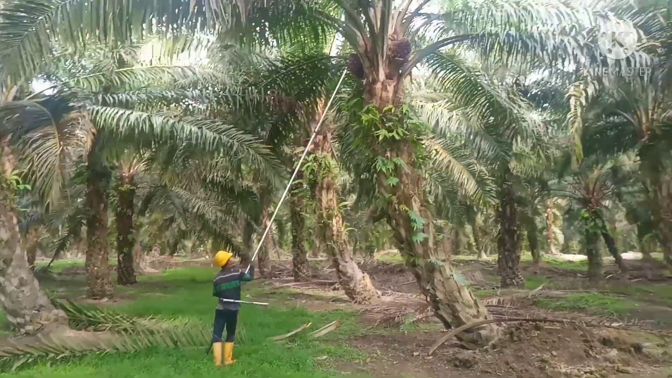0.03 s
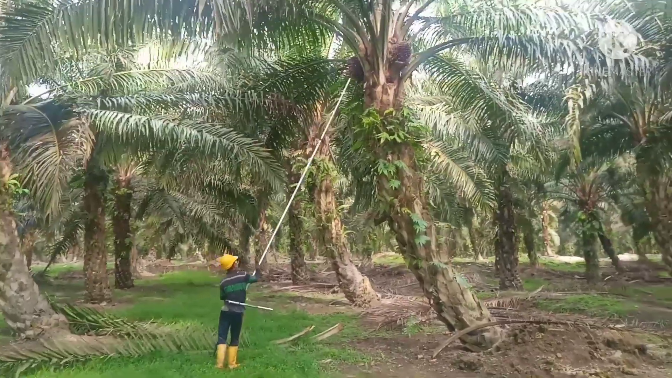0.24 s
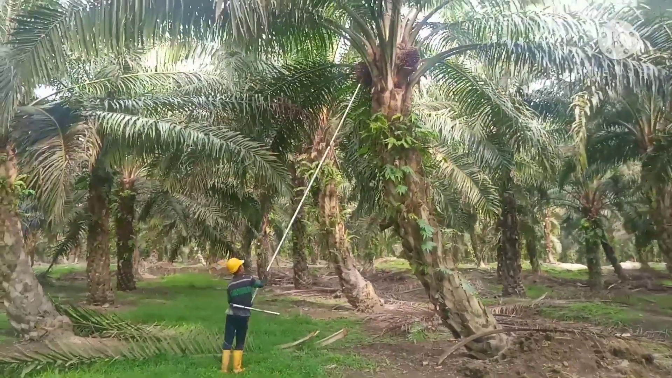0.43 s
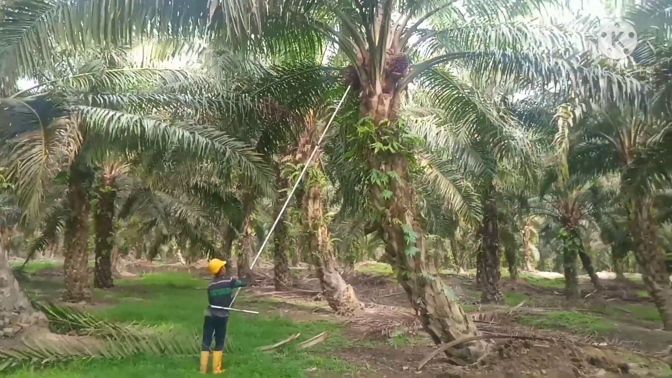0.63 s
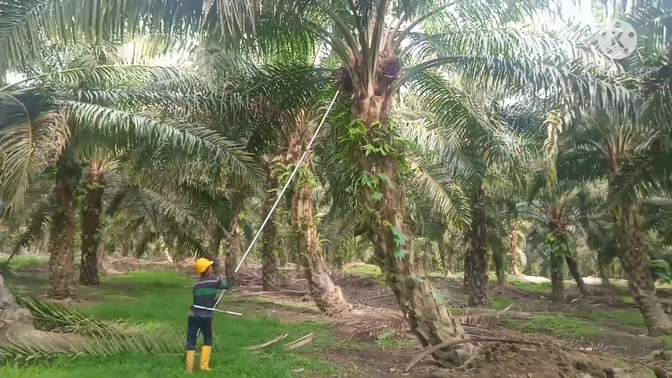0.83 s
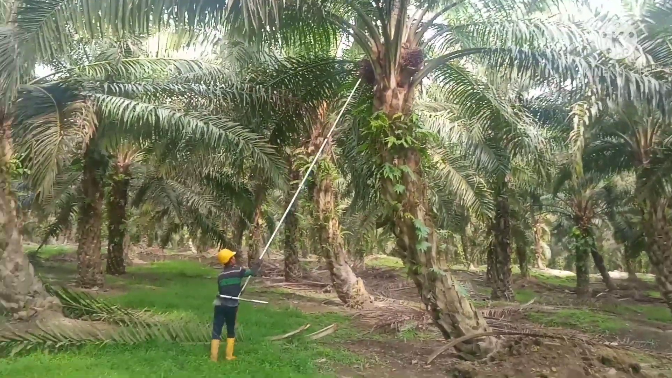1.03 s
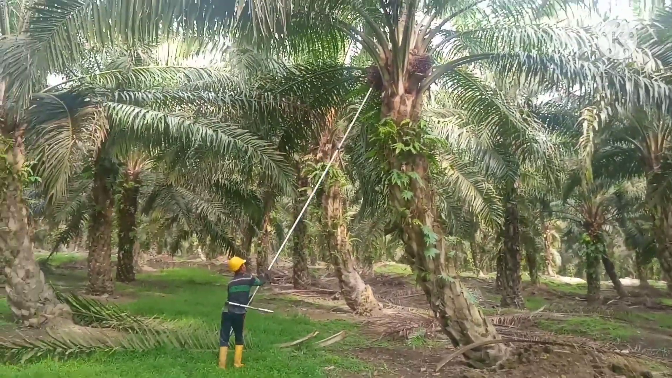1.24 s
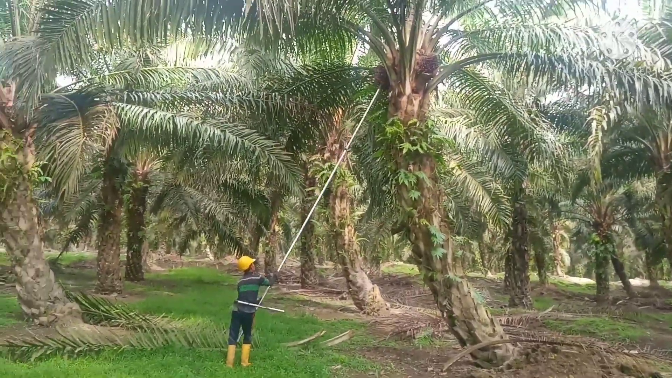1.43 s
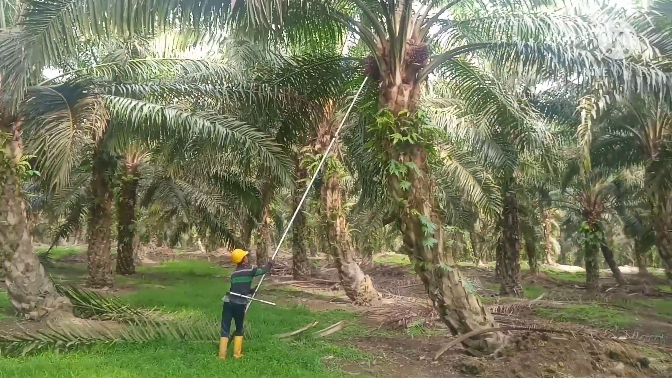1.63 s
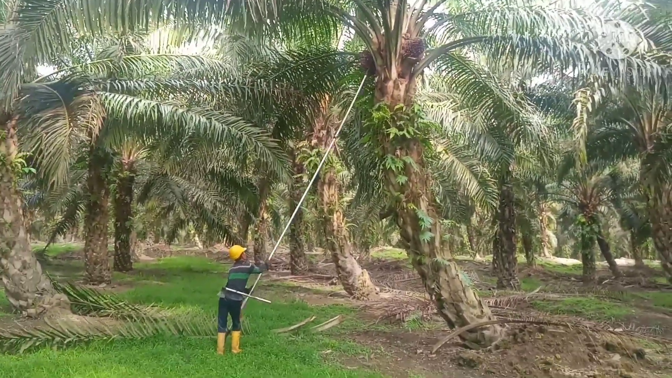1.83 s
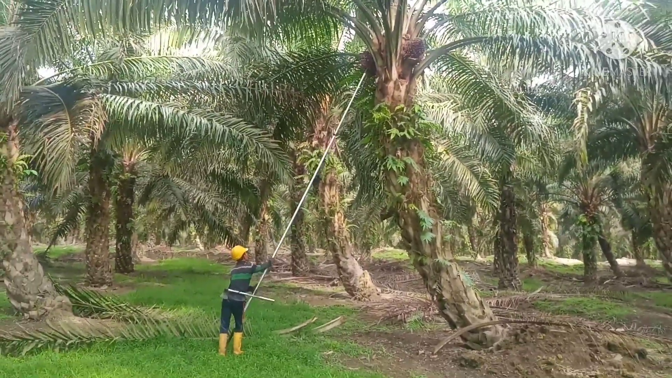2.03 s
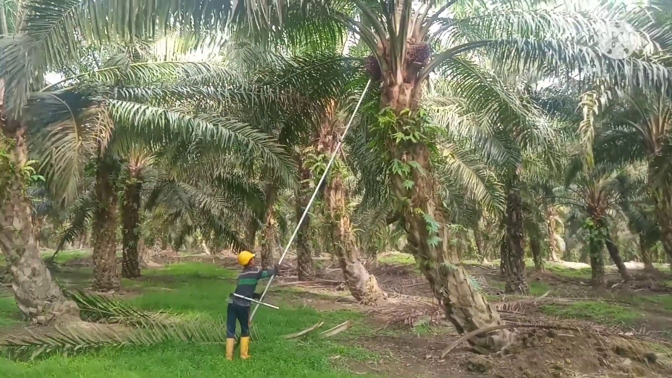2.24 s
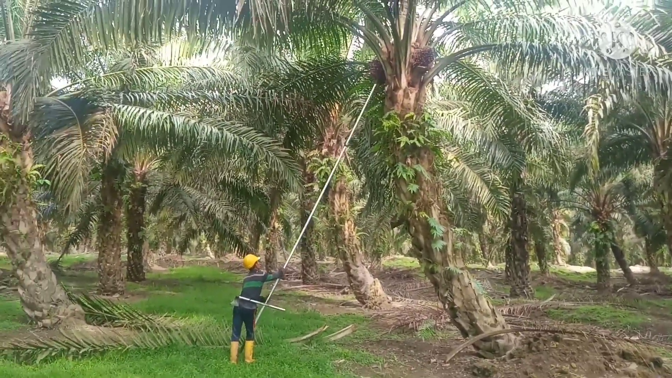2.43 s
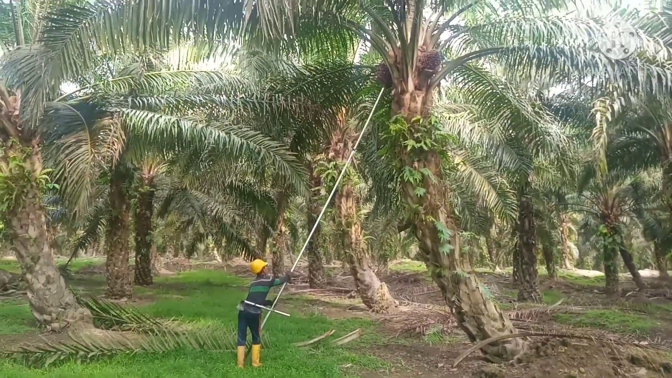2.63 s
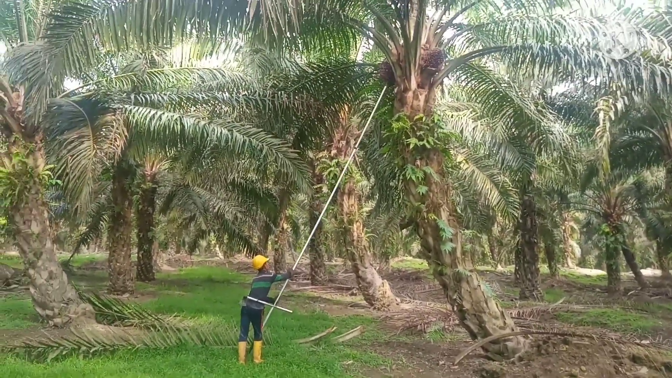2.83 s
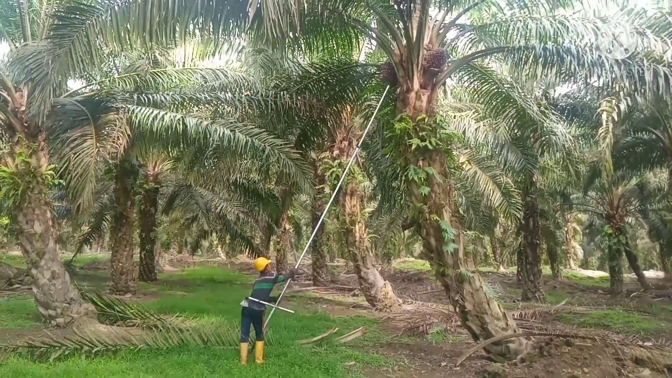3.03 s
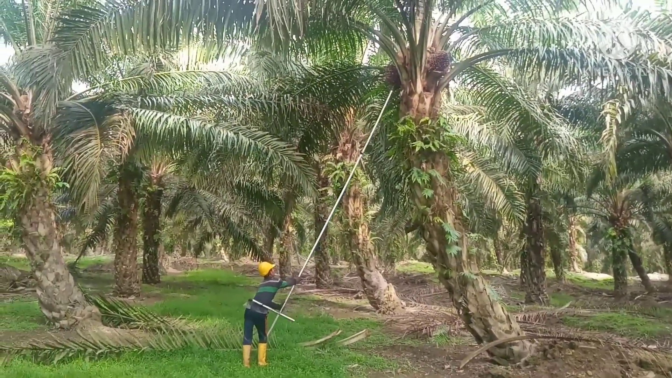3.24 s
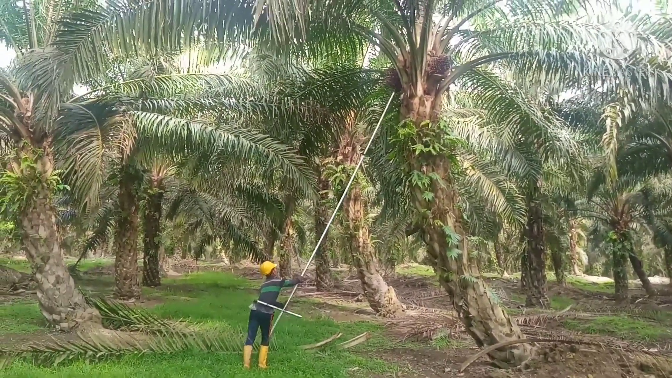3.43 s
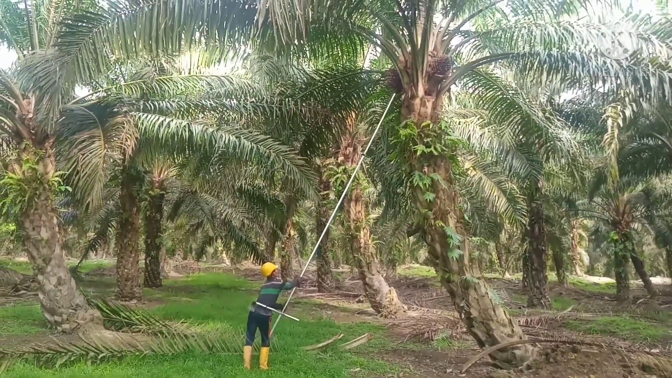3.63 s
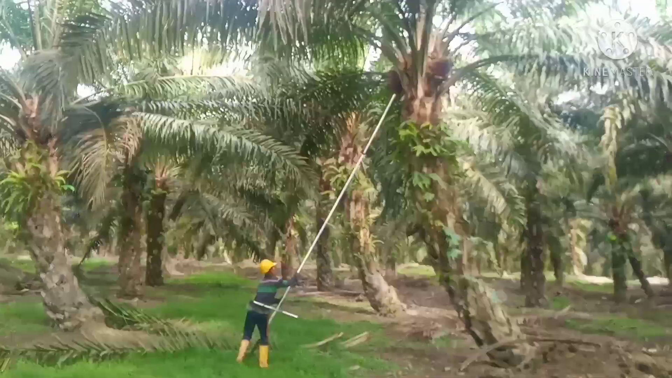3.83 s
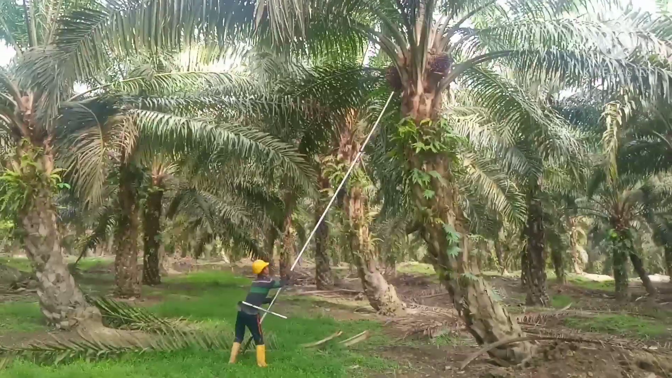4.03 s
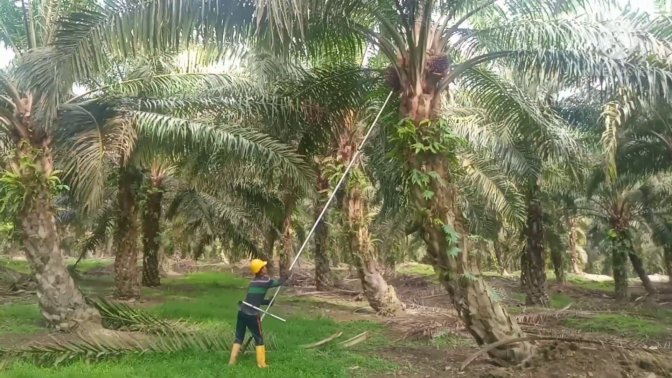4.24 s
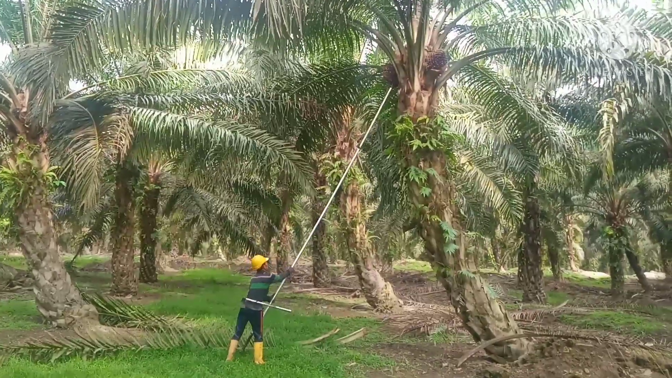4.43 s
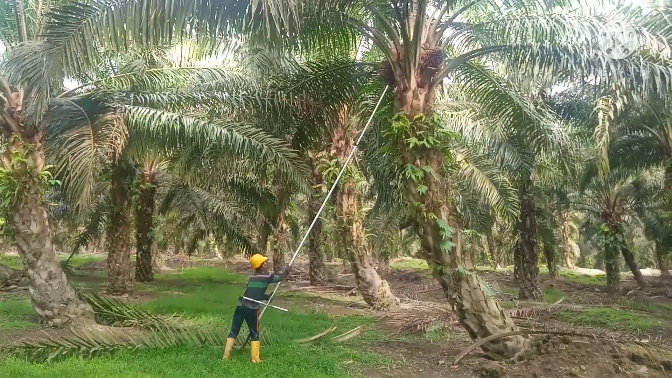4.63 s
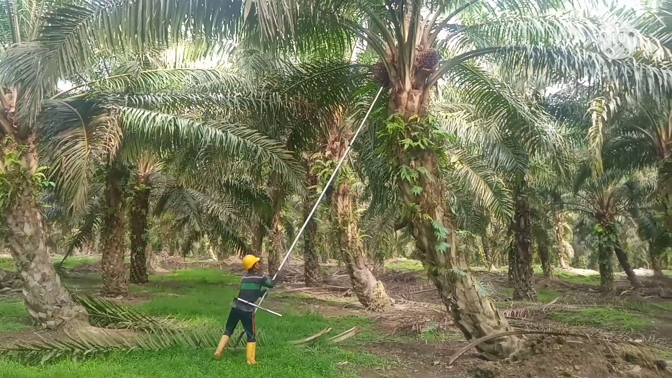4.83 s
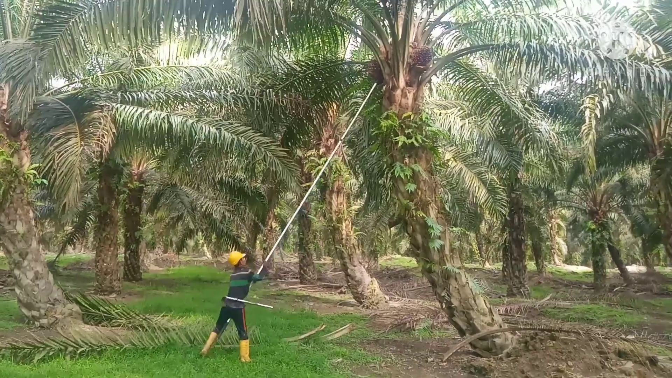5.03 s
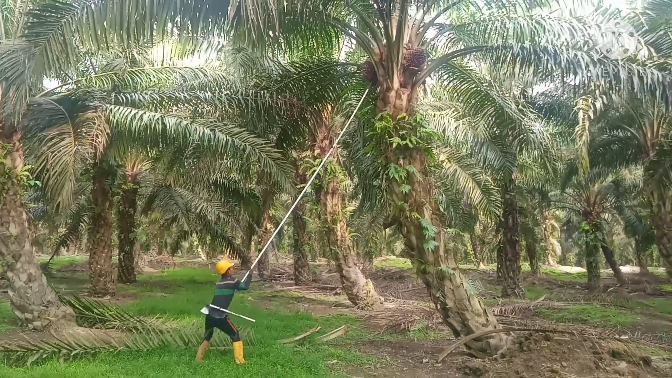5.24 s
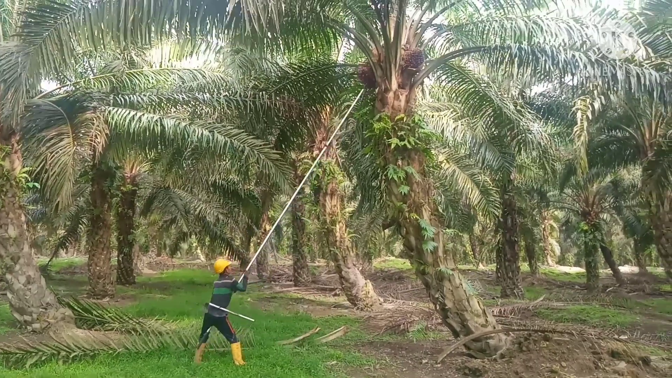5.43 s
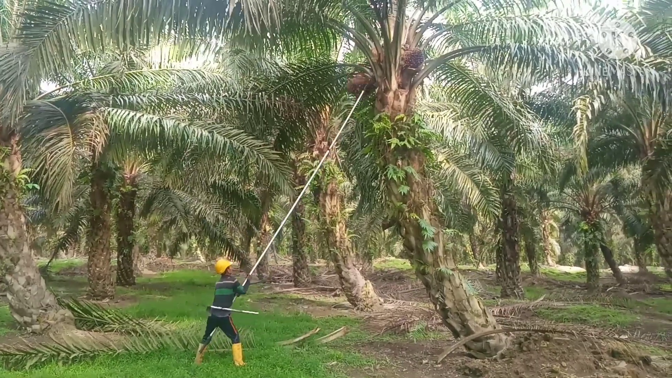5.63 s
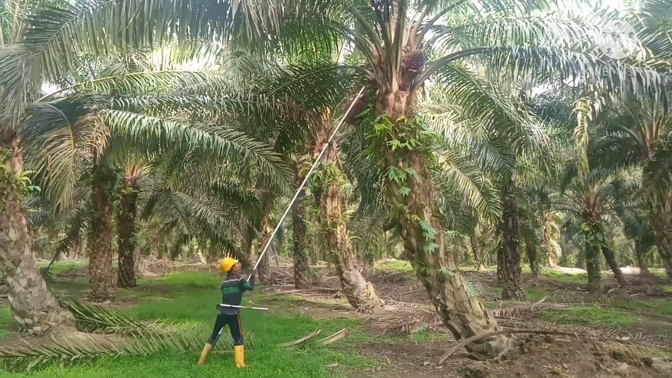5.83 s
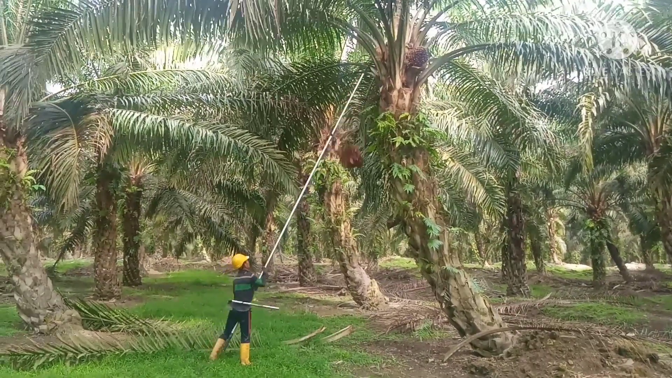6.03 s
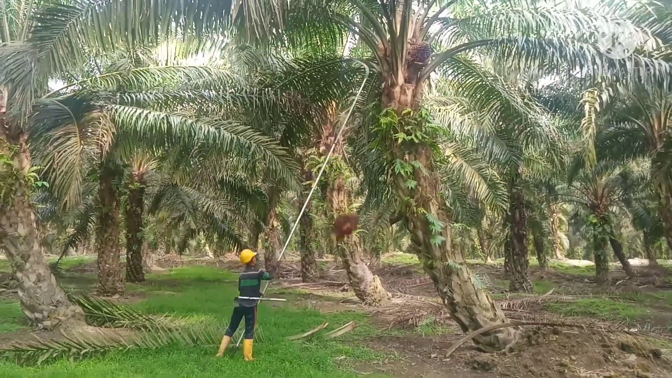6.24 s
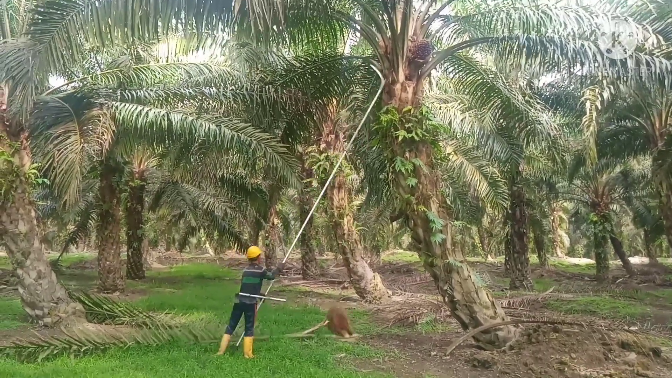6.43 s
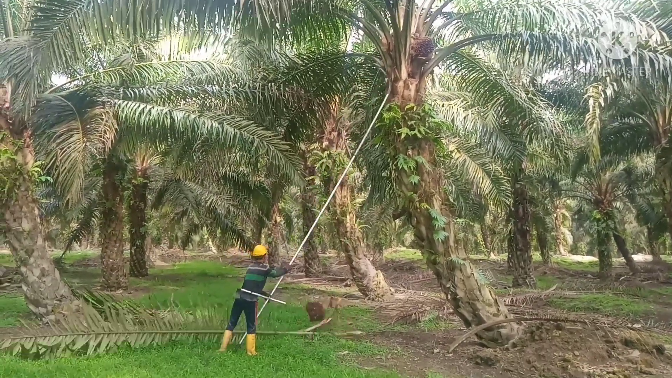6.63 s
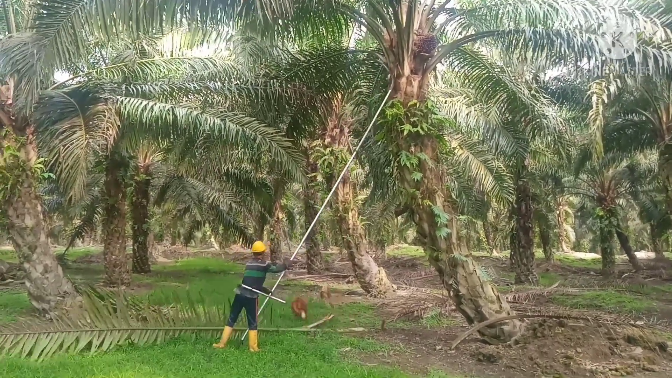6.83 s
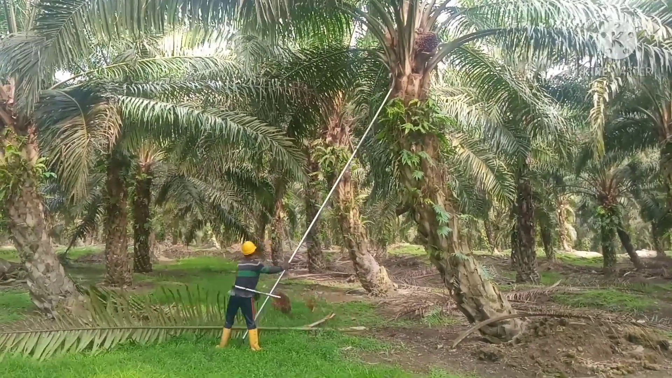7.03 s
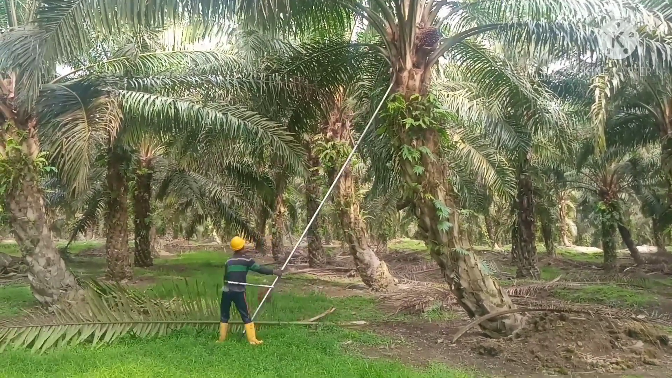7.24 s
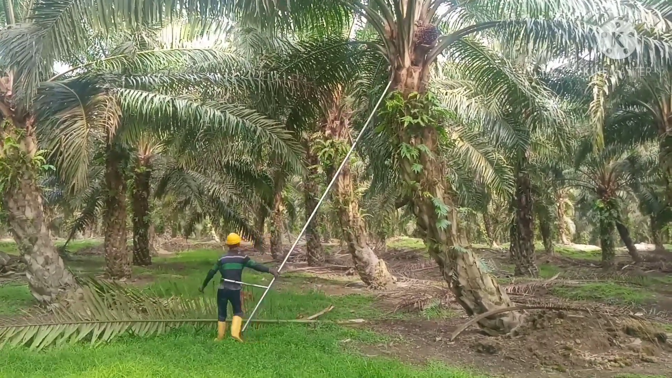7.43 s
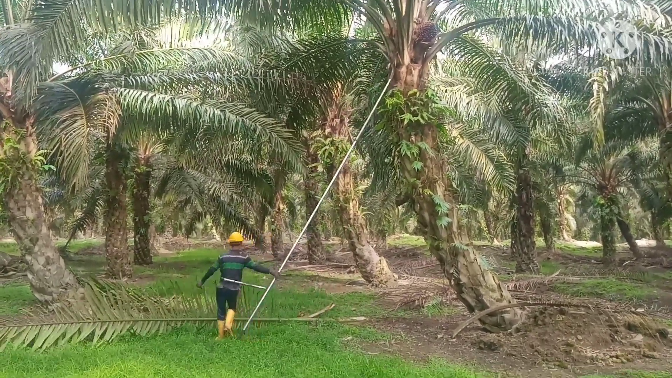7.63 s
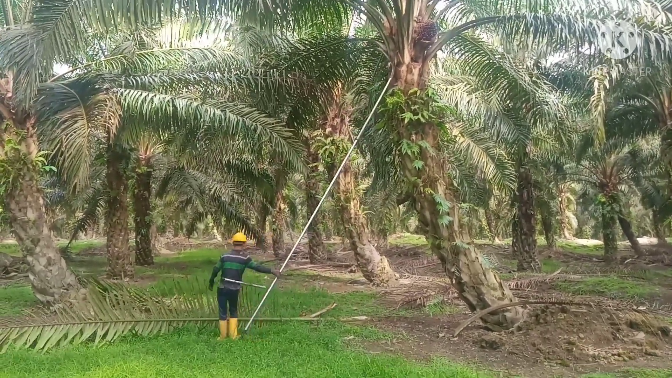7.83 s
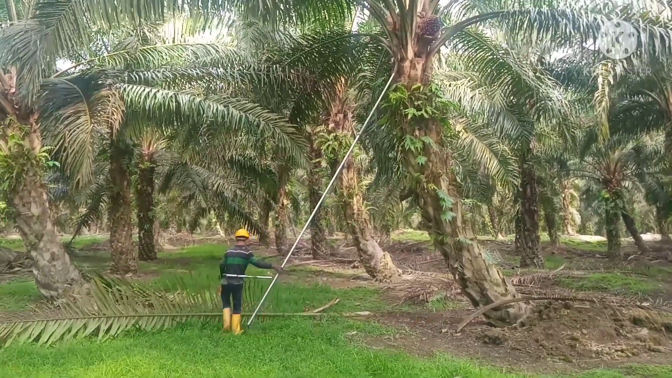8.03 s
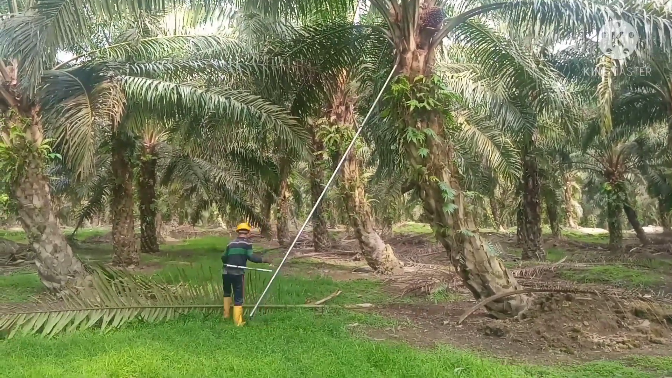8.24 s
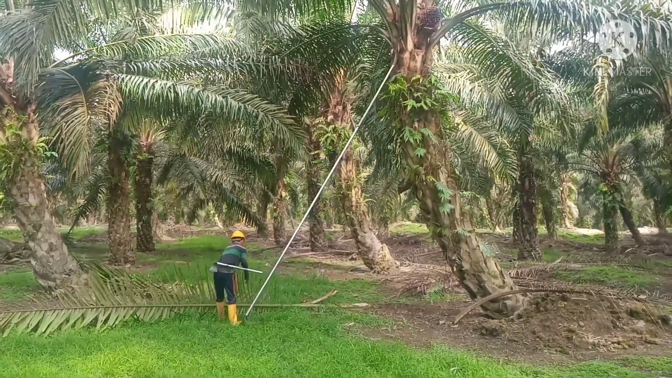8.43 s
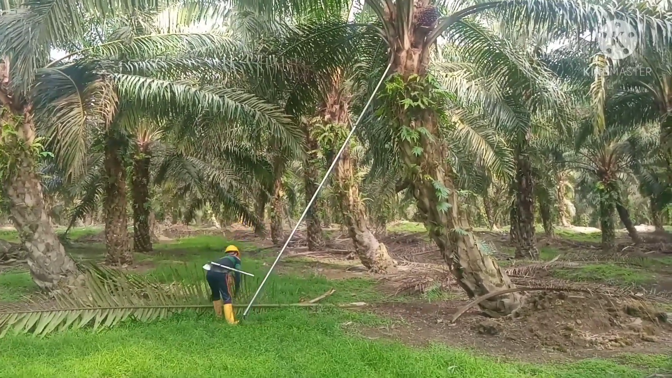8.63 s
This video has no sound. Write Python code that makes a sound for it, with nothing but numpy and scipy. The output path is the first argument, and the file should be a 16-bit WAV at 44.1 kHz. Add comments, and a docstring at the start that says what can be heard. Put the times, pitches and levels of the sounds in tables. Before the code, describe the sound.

Outdoors in a palm plantation, a long-poled sickle makes short, dry tearing pulls high in a tree, with fibres snapping and leaflets rustling. A songbird repeats chattering phrases and clear whistles over faint air and insect hiss. After a big rip, the frond and fruit bunch crash down with a slap and dull thud, then bounce softly. The microphone stands some distance away, with quick echoes from trunks.

```python
"""Air stirs and insects hiss (shaped noise) as a worker saws at an oil palm with a sickle on a long pole.
Each pull tears fibres (crackle through the stalk's resonances), stirs leaflets; fibre bundles snap.
A songbird mixes two phrases of gliding whistles, other birds call far off, and dull thuds sound.
Past six seconds the frond rips loose and crashes onto the grass with a fruit bunch, which bounces away.
The trunks scatter every sound but the air: sparse quick echoes and a long tail of filtered noise."""
import sys
import numpy as np
from scipy import signal
from scipy.fft import rfft, irfft
from scipy.io import wavfile
from scipy.ndimage import uniform_filter1d

SR = 44100
rng = np.random.default_rng(int(sys.argv[2]) if len(sys.argv) > 2 else 0)


def transcribe(u):
    """Save the signal u as a 16-bit wav file named by the first command-line argument.

    u: samples, shape (n,) or (channels, n), limited to [-1, 1]; the rate is SR.
    q: integer samples, one column per channel.
    """
    v = np.clip(np.atleast_2d(u).T, -1, 1)
    q = np.round(v * 32767).astype(np.int16)
    wavfile.write(sys.argv[1], SR, q)


N = 383669  # length of the scene in samples


def undb(db):
    """Turn decibels into a gain."""
    return 10 ** (np.asarray(db) / 20)


def unit(x):
    """Scale to an average (rms) level of 1."""
    return x / np.sqrt(np.mean(x ** 2))


def clock(length):
    """Sample times in seconds of a stretch of sound."""
    return np.arange(int(length * SR)) / SR


def add(out, s, x):
    """Mix x into out, starting at s seconds."""
    i = max(int(s * SR), 0)
    out[i:i + len(x)] += x[:max(N - i, 0)]


def ring(x, hz, width_hz):
    """Pass x through one resonance, with gain 1 at its centre."""
    return signal.lfilter(*signal.iirpeak(min(hz, SR / 3), hz / width_hz, SR), x)


def colour(x, points, size=4096):
    """Filter x through (Hz, dB) points without looking ahead; white noise keeps its power."""
    hz, db = np.transpose(points)
    bin_hz = np.arange(size // 2 + 1) * SR / size
    gain = unit(undb(np.interp(np.log(bin_hz + 1), np.log(hz), db)))
    # folding the cepstrum makes the filter respond as early as it can
    cepstrum = irfft(np.log(gain))
    cepstrum[1:size // 2] *= 2
    cepstrum[size // 2 + 1:] = 0
    response = irfft(np.exp(rfft(cepstrum)))
    return signal.oaconvolve(x, response)[:len(x)]


def walk(rate):
    """Slow random wandering with rms 1: rate random steps per second, smoothed."""
    k = int(SR / rate)
    steps = np.repeat(rng.standard_normal(N // k + 1), k)
    return unit(uniform_filter1d(steps, k)[:N])


def crackle(rate, spread_db):
    """Random clicks of uneven size, about rate per second, rms 1."""
    size = undb(spread_db * np.minimum(rng.exponential(size=N), 4))
    happens = rng.random(N) < rate / SR
    return unit(happens * size * rng.standard_normal(N))


AIR_DB = -61.5  # overall level of the air
STIR_HZ, STIR_DB = 198.5, -1  # lowest of the four faint bands, and their level within the air
# Tone of the air and insects. Each row: frequency in Hz, relative level in dB.
AIR_TONE = [(20, -40), (50, -8.5), (120, -3.5), (220, -13.5), (450, -24.5), (1300, -19.5), (3000, -6.5),
            (5200, -30.5), (6400, -34.5), (7300, -32), (8500, -22), (10400, -41.5), (15000, -44.5)]


def air():
    """Low stirring of the air, faint noise bands that come and go, and insects hissing near 8 kHz."""
    bed = colour(rng.standard_normal(N), AIR_TONE)
    low = ring(bed, 96, 160)
    stir = np.zeros(N)
    for hz in STIR_HZ * 1.62 ** np.arange(4):
        band = ring(ring(bed, hz, hz / 2), hz, hz / 2)
        stir += band * undb(np.minimum(5.0 * walk(17), 10))
    uneven_low = low * undb(3.8 * walk(12))
    # shift the bands by a second so that they do not line up with the bed
    return undb(AIR_DB) * (bed - low + uneven_low + undb(STIR_DB) * np.roll(stir, SR))


SHAKE_DB, SETTLE_S = -19, 0.43  # how much a pull shakes the leaflets, and how slowly they settle
TWIGS_PER_S, TWIG_DB = 45, -11.5  # lone woody ticks among the leaflets
# Tone of the leaflets. Each row: frequency in Hz, relative level in dB.
LEAF_TONE = [(80, -11.5), (400, -14), (1000, -4.5), (2100, 3.5), (3100, 6.5), (4200, -1.5), (5500, -28),
             (8000, -18.5), (11000, -36), (15000, -38.5)]
# The frond stirs, sags, lands and settles.
# Each row: time of the peak in seconds, peak of the motion in dB, rise in seconds, fade in seconds.
FROND_RUSTLES = [(.6, -52, 1.2, 0.5), (5.63, -51, 0.016, 0.34), (6.458, -30, 0.042, 0.079),
                 (6.9, -53.5, 0.63, 0.5)]


def leaves(force):
    """Leaflets and twigs tick together after every pull, and in a swell when the whole frond moves."""
    t, keep = np.arange(N) / SR, np.exp(-1 / (SETTLE_S * SR))
    motion = undb(SHAKE_DB) * signal.lfilter([1 - keep], [1, -keep], force)
    for s, db, rise, fade in FROND_RUSTLES:
        motion = motion + undb(db) * np.exp(-np.maximum((s - t) / rise, (t - s) / fade))
    flicker = undb(2.17 * walk(40) + 1.5 * walk(220) + 1.6 * walk(220))
    leaflets = colour(crackle(rate=4000, spread_db=1.5) * motion * flicker, LEAF_TONE)
    ticks = crackle(rate=TWIGS_PER_S, spread_db=2.8)
    twigs = unit(ring(ring(ticks, 938, 330), 1100, 1200))
    return leaflets + undb(TWIG_DB) * motion * twigs


GRIP_S, LET_GO_S = 0.014, 0.019  # the blade biting in and coming free
# louder pulls are given a rising level, softer ones a falling level:
# the level of an even pull, and dB of rise per dB above it
EVEN_PULL_DB, RISE_PER_DB = -46.5, 0.8


def pull(length, db):
    """Force of one pull: the blade grips, the level rises or falls towards db, and the blade lets go."""
    t = clock(length + .15)
    grip = np.minimum(t / GRIP_S, 1) * np.exp(-np.maximum(t - length, 0) / LET_GO_S)
    rise_db = RISE_PER_DB * (db - EVEN_PULL_DB)
    return grip * undb(db + rise_db * (np.minimum(t / length, 1) - 1))


FIBRES_PER_S, FIBRE_DB = 220, -4  # thick fibres that give one by one
DETUNE = 0.069  # typical share by which the stalk's pitches differ from pull to pull
FLEX_S, FLEX_BELOW_HZ = .018, 500  # the stalk's low rings follow the blade a little late
STALK_DB, STALK_RING_DB = -4.5, 1.16  # the tearing itself and the stalk's resonances
# Tone of the tearing. Each row: frequency in Hz, relative level in dB.
STALK_TONE = [(60, -29), (150, -13), (260, 0.5), (600, -10), (2150, -3), (3300, -4), (5000, -18),
              (7500, -28), (11000, -42), (15000, -48.5)]
# Resonances of the frond stalk. Each row: frequency in Hz before detuning, width in Hz.
STALK_RINGS = [(240, 53), (440, 56), (840, 330), (1380, 40), (2130, 160)]
# Pulls of the blade. Each row: start in seconds, length in seconds, force at the end in dB,
# weight of the stalk's low rings in dB.
BLADE_PULLS = [(0.009, 0.091, -53, 1), (0.715, 0.054, -52.5, -9), (1.161, 0.055, -43, -4),
               (1.455, 0.052, -44, 4.5), (1.671, 0.086, -42, -2), (1.932, 0.039, -45.5, -2.5),
               (2.163, 0.064, -44, -3.5), (2.586, 0.072, -45.5, 1), (2.795, 0.037, -59.5, 2.5),
               (3, 0.056, -42.5, -5), (3.577, 0.05, -60, 3), (3.906, 0.063, -42, 1.5),
               (4.097, 0.023, -53, 3), (4.355, 0.031, -41, 1), (5.074, 0.14, -28, 0),
               (5.215, 0.032, -37.5, 0), (7.339, 0.049, -53, -10), (7.718, 0.06, -66.5, 9.5)]


def sickle():
    """The blade catches and slips through fine and thick fibres, and every pull rings the stalk."""
    fine = crackle(rate=3500, spread_db=1)
    thick = crackle(rate=FIBRES_PER_S, spread_db=3)
    fibres = fine + undb(FIBRE_DB) * thick
    tearing = colour(unit(fibres * undb(2.1 * walk(130) + 2 * walk(45))), STALK_TONE)
    out = np.zeros(N)
    for s, length, db, low_db in BLADE_PULLS:
        force = pull(length, db)
        stalk = force * tearing[int(s * SR):][:len(force)]
        body = (undb(low_db) - 1) * ring(stalk, 280, 300)  # strengthens or weakens the low part
        add(out, s, undb(STALK_DB) * (stalk + body))
        for hz, width_hz in STALK_RINGS:
            low = hz < FLEX_BELOW_HZ
            shift, share = rng.standard_normal(2)
            # the stalk rings differently as the blade shifts along it
            tone = ring(stalk, hz * np.exp(DETUNE * shift), width_hz)
            add(out, s + low * FLEX_S, tone * undb(STALK_RING_DB + low * low_db + 2 * share))
    return out


def pulling():
    """Force on the blade over all pulls, which also shakes the leaves."""
    force = np.zeros(N)
    for s, length, db, _ in BLADE_PULLS:
        add(force, s, pull(length, db))
    return force


# Stalk fibres snapping. Each row: start in seconds, peak in dB before a common lift,
# ring in Hz, knock of the stalk in dB relative to the snap.
FIBRE_SNAPS = [(.123, -29.5, 2350, -11), (0.235, -37.5, 1240, -18.5), (.317, -37.5, 1093, -20),
               (.701, -36, 1440, -29), (0.945, -39.5, 904, 1.5), (1.974, -31.5, 1340, -15.5),
               (2.197, -28, 1420, -37), (2.381, -30, 1960, -11), (2.611, -37.5, 1519, -19),
               (3.015, -36, 1140, -26), (3.079, -39, 2350, -8), (3.284, -40, 2294, -10.5),
               (4.279, -41.5, 2270, -29.5), (4.368, -31.5, 1969, -9), (5.203, -18, 2030, -6),
               (5.604, -34.5, 2080, -23.5), (5.733, -27, 1683, -9.5), (6.311, -38.5, 1296, -21.5),
               (6.394, -22.5, 1100, 0.5), (6.523, -29, 2840, -25), (6.971, -46.5, 1010, -20),
               (8.12, -48, 928, -22)]


def snaps():
    """A fibre bundle breaks within milliseconds: a woody ring and a knock of the stalk."""
    out, t = np.zeros(N), clock(.08)
    for s, db, hz, knock_db in FIBRE_SNAPS:
        burst = rng.standard_normal((2, len(t))) * t * np.exp(-t / 0.0041)
        wood = ring(ring(burst[0], hz, 0.5 * hz), 1750, 2100)
        wood = wood + 2 * ring(wood, 817, 110)  # the stalk sings on briefly
        knock = ring(ring(burst[1], 286, 110), 240, 490)
        for part, part_db in ((wood, 0), (knock, knock_db)):
            add(out, s, undb(db + 1.5 + part_db) * part / np.abs(part).max())
    return out


FLUTTER_DB = 2.5  # unevenness of a bird's loudness within a syllable


def sing(syllable, top_hz, db, rough, depth=1):
    """One nearly pure whistle glides along its shape, scaled by depth; pitch and loudness shake a little."""
    at, pitch, level_db = np.transpose(syllable)
    t = clock(at[-1])

    def tremble():
        """Smoothed random shaking with rms 1."""
        return unit(np.convolve(rng.standard_normal(len(t)), np.hanning(SR // 240), "same"))

    shake, flutter = tremble(), tremble()
    glide = uniform_filter1d(np.interp(t, at, pitch ** depth), size=300, mode="nearest")
    hz = top_hz * glide * (1 + rough * shake)
    # fade in and out over 3 ms
    edges = np.sin(np.pi / 2 * np.clip(np.minimum(t, t[-1] - t) / .003, 0, 1)) ** 2
    loudness = undb(db + np.interp(t, at, level_db)) * unit(undb(FLUTTER_DB * flutter))
    return edges * loudness * np.sin(2 * np.pi * np.cumsum(hz) / SR)


# the three hooks start after the high tip, then the arch: (s)
HOOK_S, LOW_HOOK_S, THIRD_HOOK_S, ARCH_S = .038, .096, .137, .16
LOW_HOOK_HZ, THIRD_HOOK_HZ = 2473, 2954
# Shapes of the bird's syllables: a high tip (in both phrases), a rising hook and an arch.
# Each row: seconds from the syllable's start, pitch as a share of its reference pitch, relative level in dB.
TIP_SHAPE = [(0, 1.15, -18), (.008, 1.03, 2), (.02, .93, 4.5)]
HOOK_SHAPE = [(0, .66, -7.5), (.009, .9, 1), (.018, 1, 2.5), (.032, 1, -8.5)]
ARCH_SHAPE = [(0, .78, -4.5), (.016, 0.92, -4), (.032, 0.98, -5), (.048, .95, 1.5), (.068, .74, 4)]
# Chattering phrases. Each row: start in seconds, reference pitch of the high tip in Hz,
# level of the later hooks in dB, reference pitch of the closing arch in Hz,
# level in dB of the arch, which also sets the tip and first hook (all levels before mixing).
CHATTER_PHRASES = [(.206, 4330, -37, 3930, -33), (1.119, 4448, -40.5, 4027, -34.5),
                   (2.336, 4840, -36, 3900, -34.5), (3.748, 4205, -37, 4007, -34.5),
                   (4.765, 4643, -36, 3872, -35), (5.891, 4580, -38.5, 3880, -35.5),
                   (7.071, 4170, -41.5, 3830, -34), (8.017, 4200, -40.5, 3735, -37)]


def chatter():
    """A high tip, three rising hooks and a burry arch, in the same rhythm every time."""
    out = np.zeros(N)
    for s, tip_hz, hooks_db, hz, db in CHATTER_PHRASES:
        # every tip starts near the same high note, so the lower ones dive further
        dive = np.clip((5100 - tip_hz) / 900, 0, .8)
        add(out, s, sing(TIP_SHAPE, tip_hz, db - 7, rough=0.0073, depth=dive))
        add(out, s + HOOK_S, sing(HOOK_SHAPE, 3210, db - 2.0, rough=0.0056))
        add(out, s + LOW_HOOK_S, sing(HOOK_SHAPE, LOW_HOOK_HZ, hooks_db - 4, rough=0.01))
        add(out, s + THIRD_HOOK_S, sing(HOOK_SHAPE, THIRD_HOOK_HZ, hooks_db, rough=0.0073))
        add(out, s + ARCH_S, sing(ARCH_SHAPE, hz, db, rough=0.018))
    return out


# Calls of other birds. Each row: start in seconds, length in seconds,
# pitch at the start in Hz, pitch at the end in Hz, peak level in dB before mixing.
DISTANT_CALLS = [(0.487, 0.094, 3140, 3404, -39.5), (2.807, 0.18, 2426, 3100, -63),
                 (3.099, 0.2, 2320, 2850, -66), (1.756, 0.15, 778, 690, -68), (4.942, 0.11, 577, 637, -60),
                 (5.356, 0.42, 677, 593, -62), (8.399, 0.11, 770, 683, -68)]


def far_birds():
    """Thin rising whistles and low coos from deep in the plantation; a wavering pitch makes them husky."""
    out = np.zeros(N)
    for s, length, start_hz, end_hz, db in DISTANT_CALLS:
        t = clock(length)
        hz = np.linspace(start_hz, end_hz, len(t)) + 22 * walk(150)[:len(t)]
        swell = np.sin(np.pi * t / length)
        add(out, s, undb(db) * swell * np.sin(2 * np.pi * np.cumsum(hz) / SR))
    return out


# Dull thuds of boots and the bouncing bunch.
# Each row: start in seconds, peak in dB before echoes, pitch in Hz.
SOIL_THUDS = [(.654, -48, 119), (6.377, -27.5, 127.7), (6.383, -19, 274.5), (6.851, -37, 135),
              (8.254, -50, 138)]


def thuds():
    """Soft soil takes a blow and rings low for a few cycles."""
    out, t = np.zeros(N), clock(.2)
    for s, db, hz in SOIL_THUDS:
        push = rng.standard_normal(len(t)) * np.exp(-t / 0.013)
        soil = ring(ring(push, hz, 0.75 * hz), hz, 0.61 * hz)
        add(out, s, undb(db) * soil / np.abs(soil).max())
    return out


WHISTLE_HZ = 3525  # reference pitch of the long whistle
# Shapes of a short pip and the long whistle.
# Each row: seconds from the syllable's start, pitch as a share of its reference pitch, relative level in dB.
PIP_SHAPE = [(0, 0.95, 2), (.013, 0.99, 6)]
WHEEP_SHAPE = [(0, .64, -11), (.012, .87, -5), (.026, 0.96, -7.5), (.044, 1, -8.5), (.064, 0.97, -3.5),
               (.08, .88, 2), (.1, .7, -10.5), (.12, .5, -11)]
# Whistled phrases. Each row: start of the long whistle in seconds, its level in dB before mixing.
WHISTLE_PHRASES = [(0.848, -27.5), (2.083, -29.5), (3.414, -28), (4.587, -29), (6.255, -28.5),
                   (7.538, -29.5), (8.618, -31.5)]


def whistles():
    """A faint high tip and a short pip lead into one long, clear whistle."""
    out, hz = np.zeros(N), WHISTLE_HZ
    for s, db in WHISTLE_PHRASES:
        add(out, s - .069, sing(TIP_SHAPE, 1.42 * hz, db - 28, rough=0.05))
        add(out, s - .045, sing(PIP_SHAPE, .885 * hz, db - 11.5, rough=0.0044))
        add(out, s, sing(WHEEP_SHAPE, hz, db, rough=0.004))
    return out


SLAP_S, SLAP_DB = 6.3495, -7.5  # the stalk's first contact: time and peak before echoes
# Tone of the crushed grass. Each row: frequency in Hz, relative level in dB.
GROUND_TONE = [(30, -26.5), (110, -2.5), (260, 4.5), (550, -6), (1000, -0.5), (1900, -7), (3200, -5),
               (5500, -27.5), (8200, -33), (11000, -58), (15000, -52)]
# Frond and bunch crushing into the grass.
# Each row: start in seconds, starting level in dB before echoes, fade in seconds.
CRASH_BLOWS = [(6.351, -26, 0.044), (6.386, -23.5, 0.021), (6.405, -29.5, 0.05), (6.854, -50, 0.076)]


def crash():
    """The heavy stalk slaps down with one sharp pulse; bunch and frond follow, crushing and splintering."""
    force, slap, t = np.zeros(N), np.zeros(N), clock(.4)
    for s, db, fade in CRASH_BLOWS:
        add(force, s, undb(db) * np.exp(-t / fade))
    add(slap, SLAP_S, np.hanning(SR // 3600))  # a contact of a fraction of a millisecond
    slap = ring(ring(slap, 1900, 770) + ring(slap, 900, 530), 1640, 1330)
    cracks = undb(-23) * force * crackle(rate=3700, spread_db=0.0)
    splinters = ring(ring(cracks, 6200, 5000), 6200, 6000)
    crush = colour(force * crackle(rate=13000, spread_db=0.8), GROUND_TONE)
    return crush + splinters + undb(SLAP_DB) * slap / np.abs(slap).max()


# Leaflets splitting sharply in the crash. Each row: start in seconds, peak in dB before echoes.
LEAFLET_SPLITS = [(6.3958, -27.5), (6.418, -30)]


def splits():
    """A leaflet's midrib cracks with a short, bright tick."""
    out, t = np.zeros(N), clock(.03)
    for s, db in LEAFLET_SPLITS:
        crack = ring(rng.standard_normal(len(t)) * np.exp(-t / 0.0023), 6900, 1800)
        add(out, s, undb(db) * crack / np.abs(crack).max())
    return out


def grove(x, wet_db, near_t60, far_t60, far_db, trunks_per_s):
    """Near trunks send back separate quick echoes, the rows behind a long tail without bass or top."""
    # each t60 is the time in seconds in which the echoes fall by 60 dB
    t = clock(1.3)
    near, far = rng.standard_normal((2, len(t)))
    near = unit(np.sign(near) * (rng.random(len(t)) < trunks_per_s / SR)) * undb(-60 * t / near_t60)
    far = ring(far, 2300, 4200) * undb(-60 * t / far_t60)
    # nothing returns in the first 4 ms
    echo = (near + undb(far_db) * far) * np.clip((t - .004) / 0.007, 0, 1)
    return x + undb(wet_db) * signal.oaconvolve(x, echo / np.linalg.norm(echo))[:N]


def scene():
    """The cutting is up in the crown, the crash down on the grass; the birds sit deeper among the trees."""
    cutting = sickle() + snaps() + leaves(pulling())
    crown = grove(cutting, wet_db=-8.0, near_t60=0.38, far_t60=1.0, far_db=-13.5, trunks_per_s=2500)
    landing = crash() + splits() + thuds()
    grass = grove(landing, wet_db=-10.5, near_t60=0.38, far_t60=0.98, far_db=-9, trunks_per_s=2500)
    far = far_birds()
    song = grove(chatter() + far, wet_db=2.0, near_t60=0.35, far_t60=0.82, far_db=-3.5, trunks_per_s=900)
    calls = grove(whistles(), wet_db=-1.5, near_t60=0.47, far_t60=0.86, far_db=-1.5, trunks_per_s=210)
    # the far birds are also added once more without echoes
    birds = undb(-5.5) * song + undb(-4.5) * (calls + far)
    return (crown + grass + birds + air())[None]


TOP_HZ = 15600  # upper limit of the recorder


def record(dry):
    """The recorder cuts the top with a steep low-pass filter."""
    return signal.sosfilt(signal.ellip(10, .2, 70, TOP_HZ, fs=SR, output="sos"), dry)


dry = scene()
out = record(dry)
transcribe(out)
```